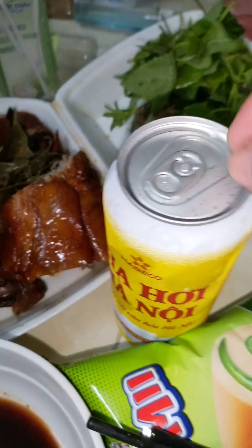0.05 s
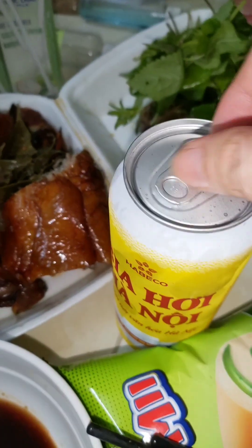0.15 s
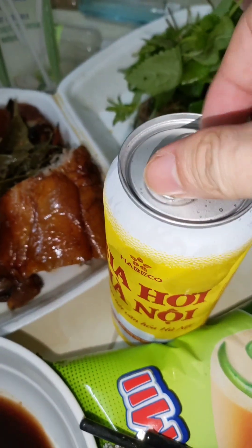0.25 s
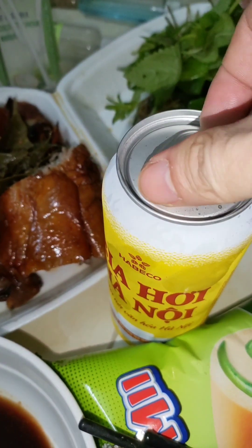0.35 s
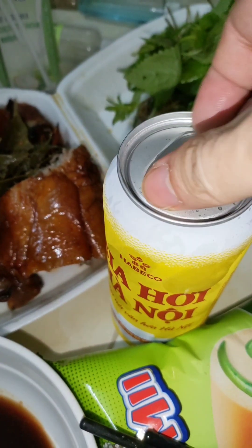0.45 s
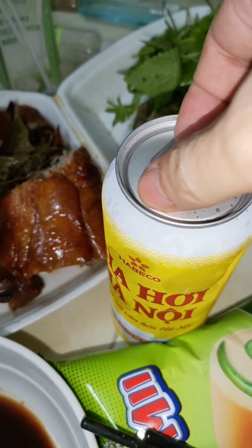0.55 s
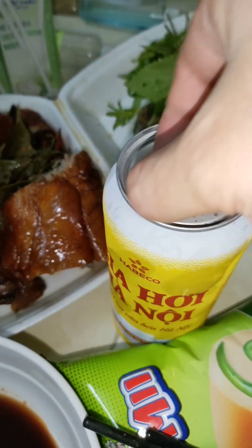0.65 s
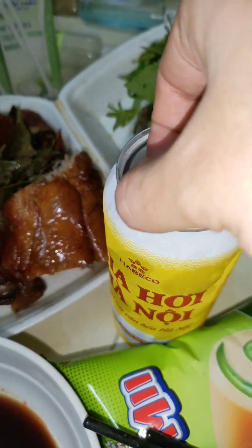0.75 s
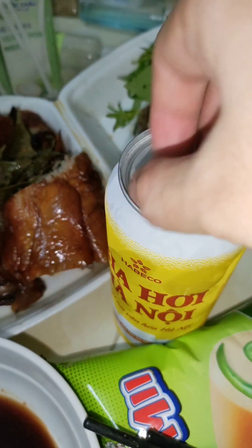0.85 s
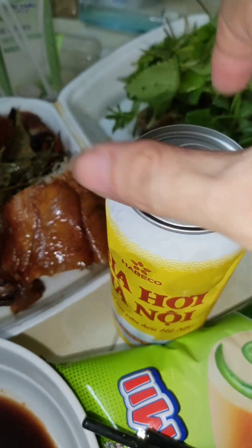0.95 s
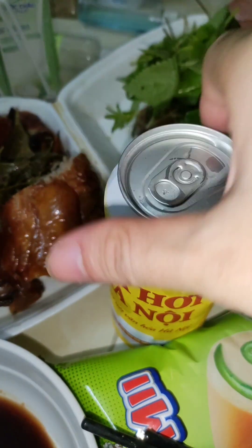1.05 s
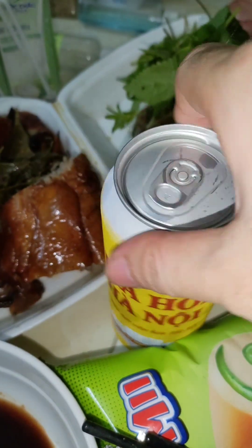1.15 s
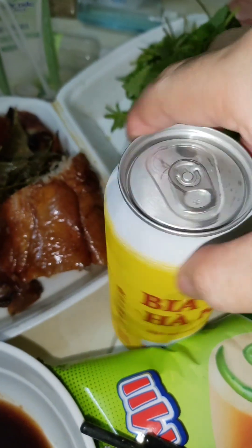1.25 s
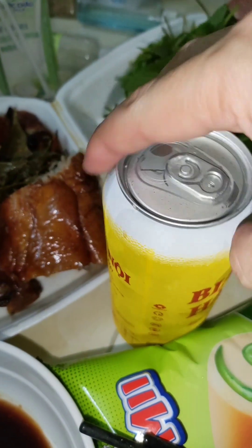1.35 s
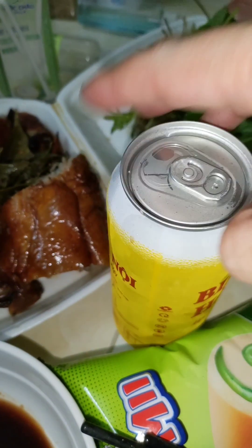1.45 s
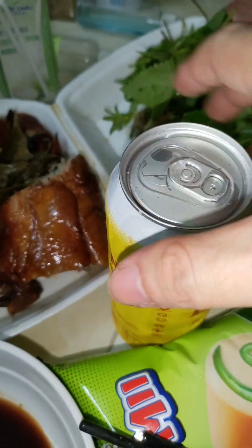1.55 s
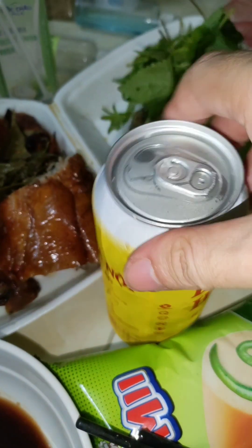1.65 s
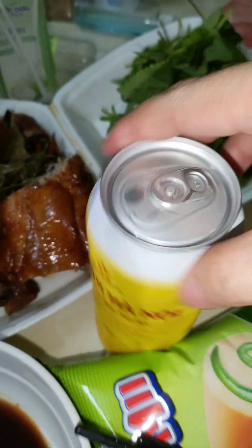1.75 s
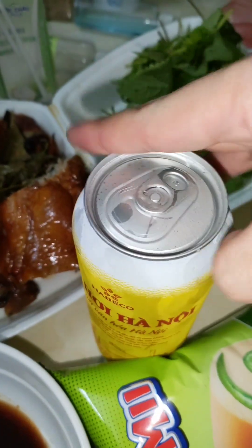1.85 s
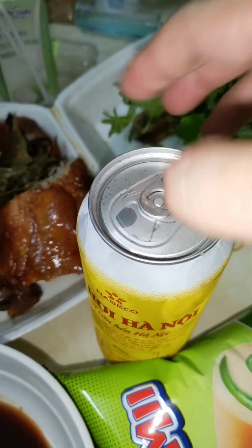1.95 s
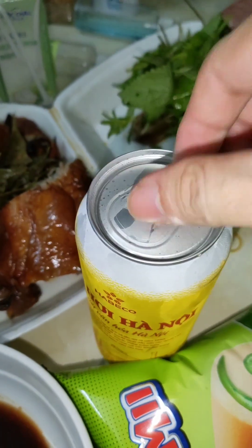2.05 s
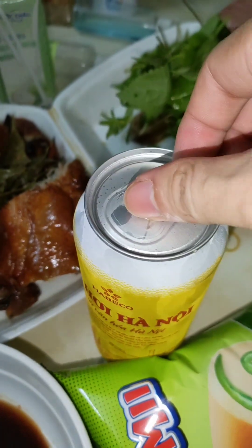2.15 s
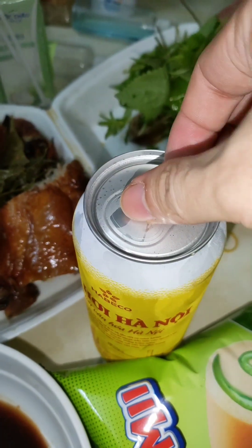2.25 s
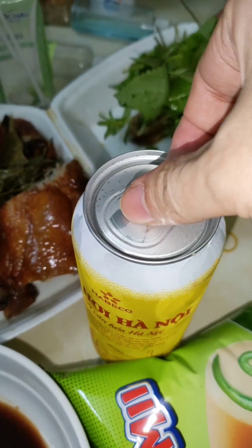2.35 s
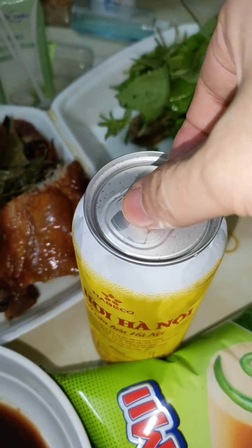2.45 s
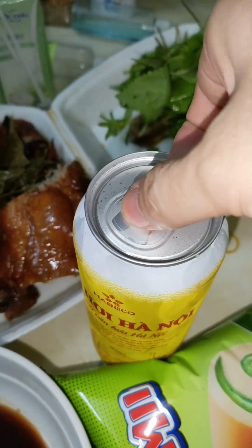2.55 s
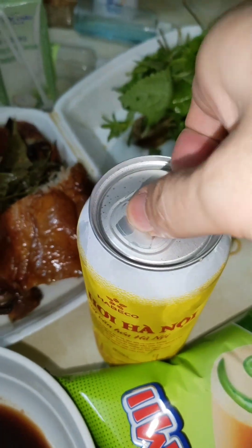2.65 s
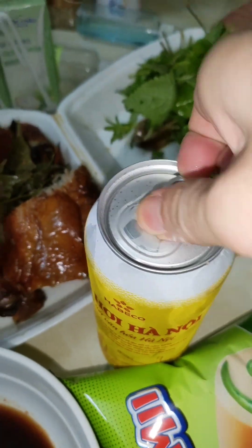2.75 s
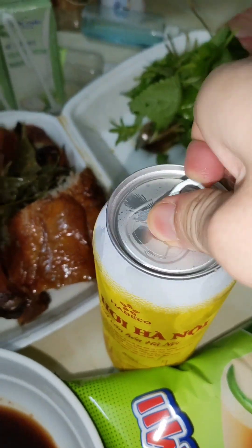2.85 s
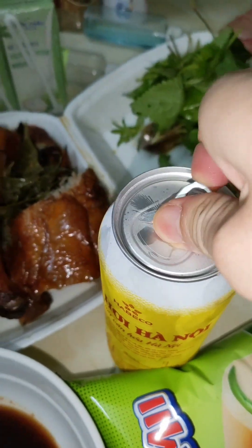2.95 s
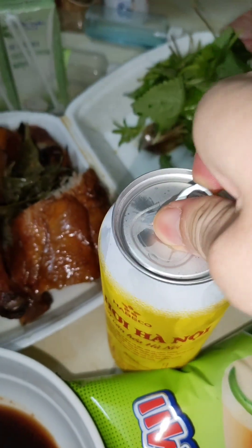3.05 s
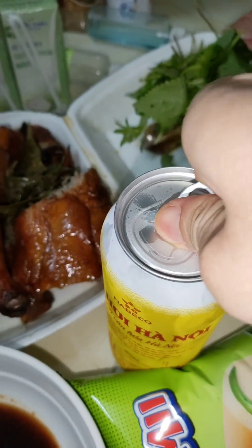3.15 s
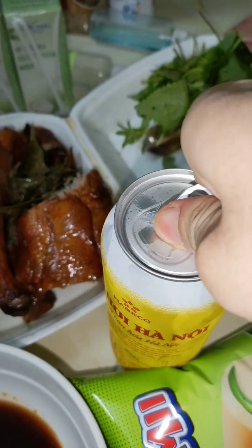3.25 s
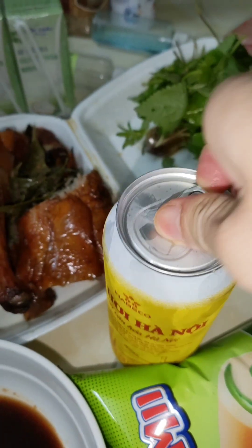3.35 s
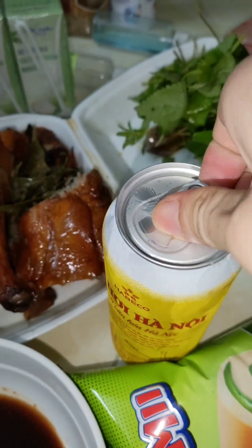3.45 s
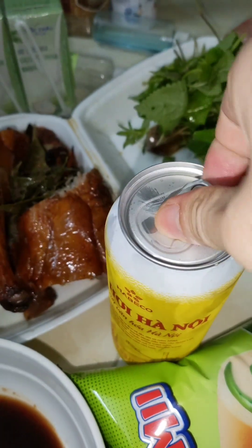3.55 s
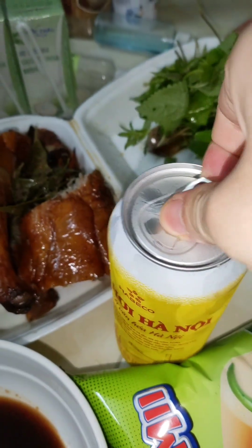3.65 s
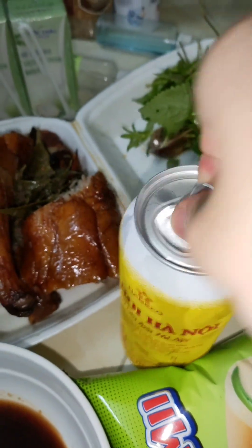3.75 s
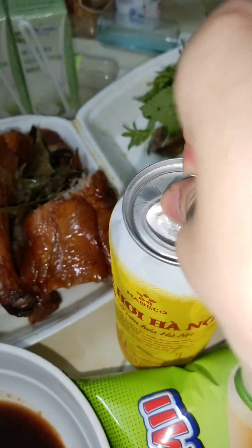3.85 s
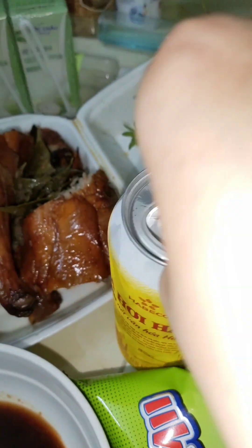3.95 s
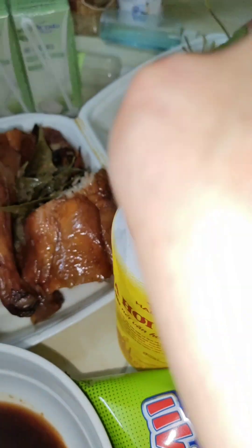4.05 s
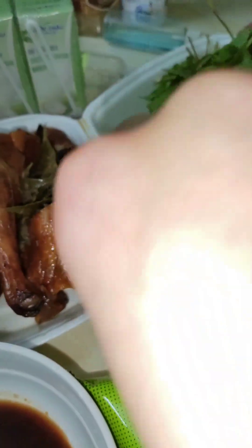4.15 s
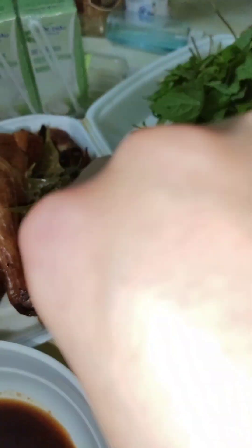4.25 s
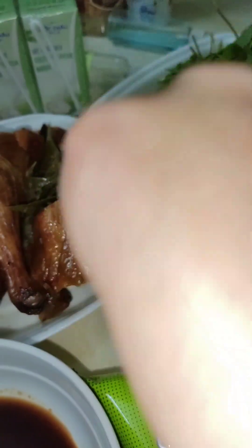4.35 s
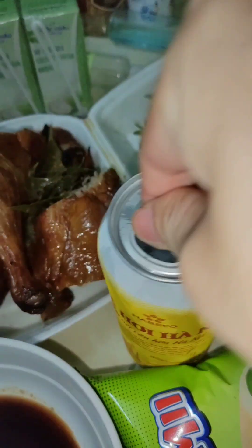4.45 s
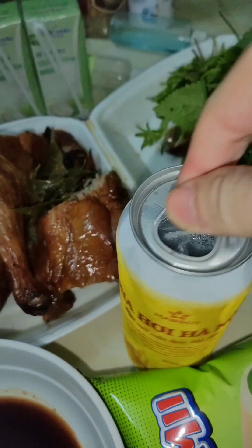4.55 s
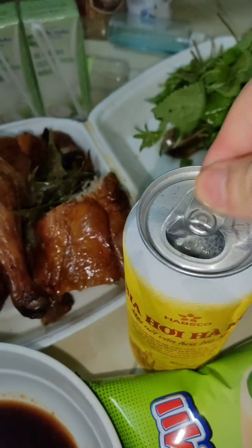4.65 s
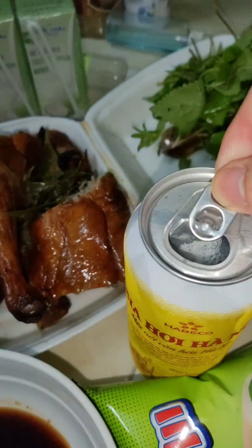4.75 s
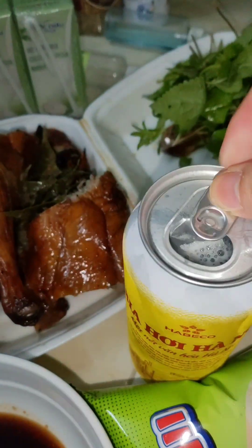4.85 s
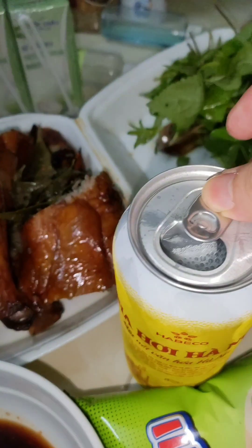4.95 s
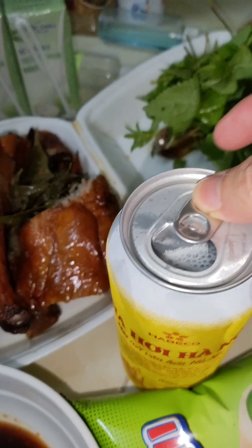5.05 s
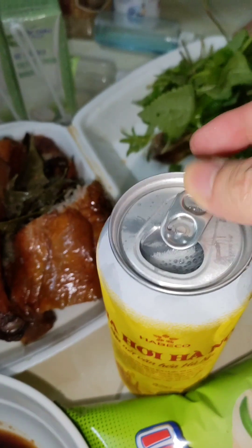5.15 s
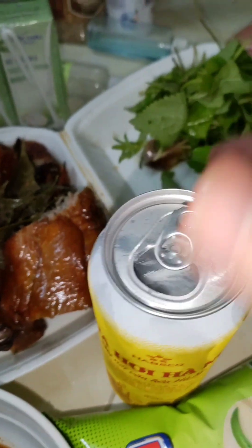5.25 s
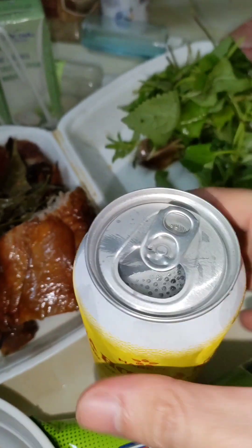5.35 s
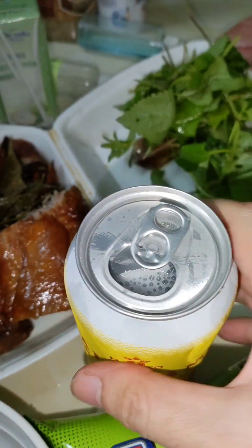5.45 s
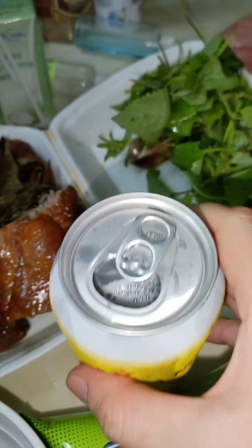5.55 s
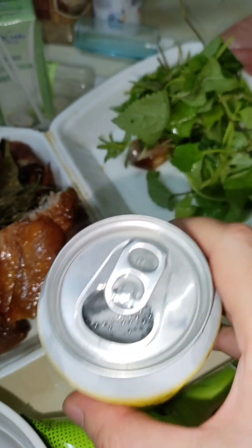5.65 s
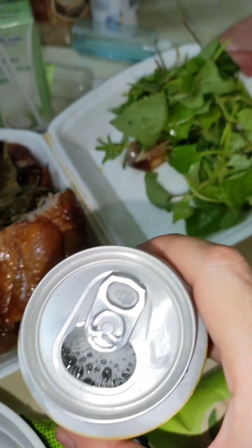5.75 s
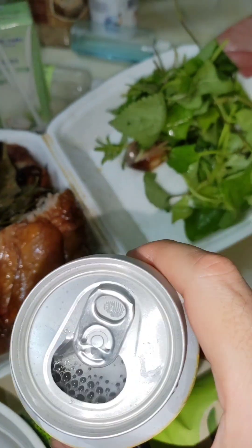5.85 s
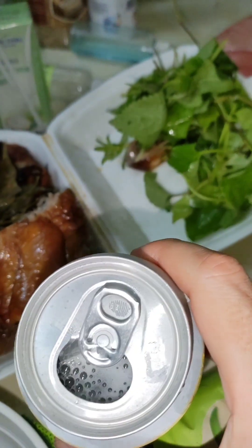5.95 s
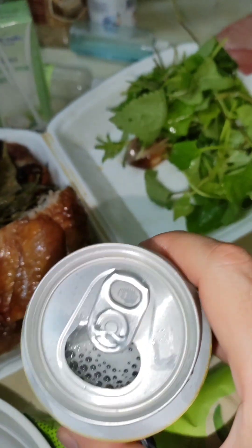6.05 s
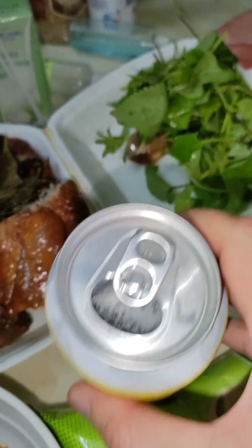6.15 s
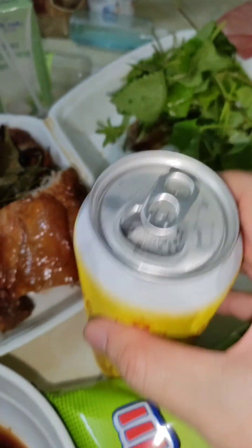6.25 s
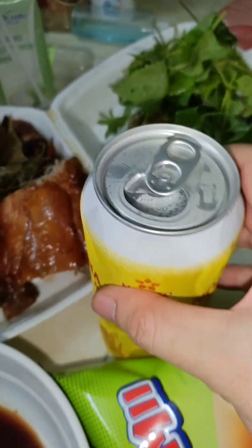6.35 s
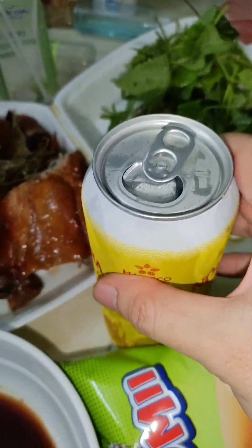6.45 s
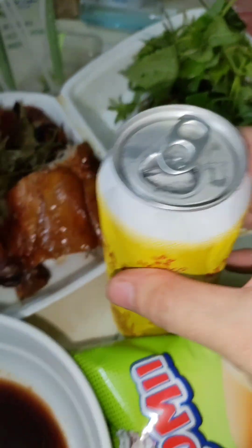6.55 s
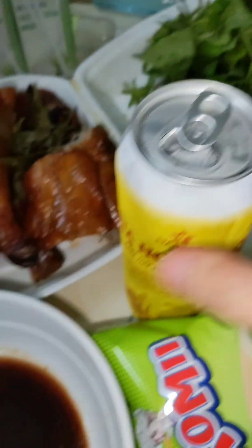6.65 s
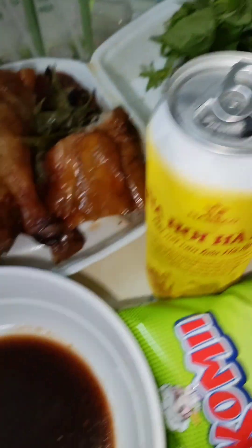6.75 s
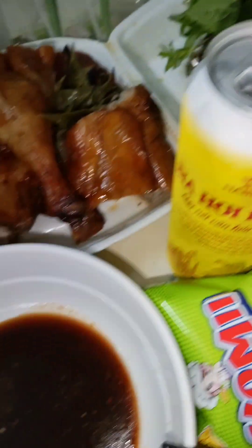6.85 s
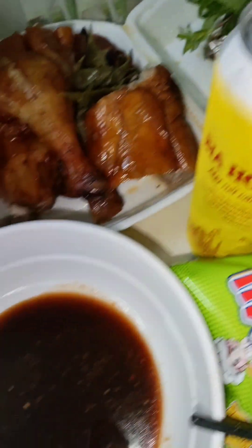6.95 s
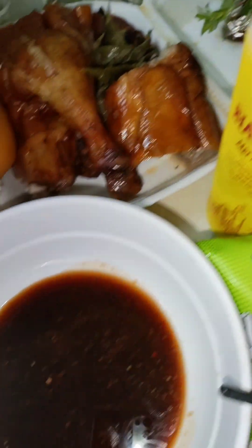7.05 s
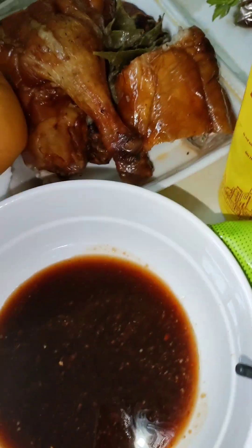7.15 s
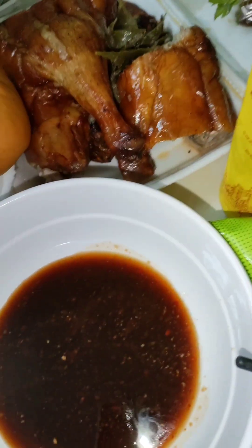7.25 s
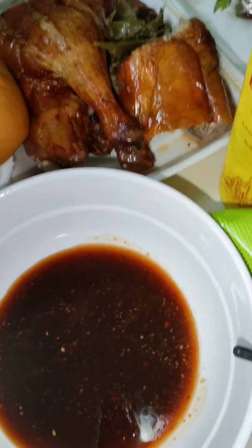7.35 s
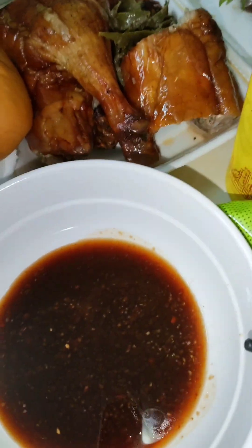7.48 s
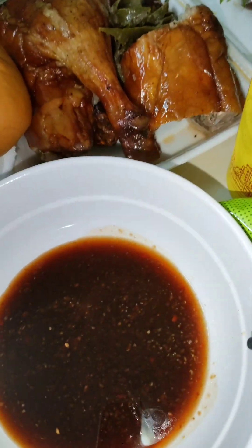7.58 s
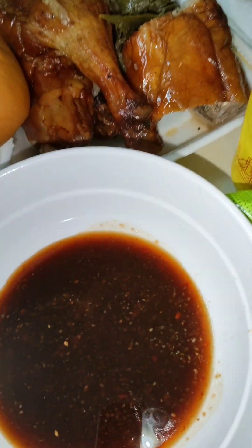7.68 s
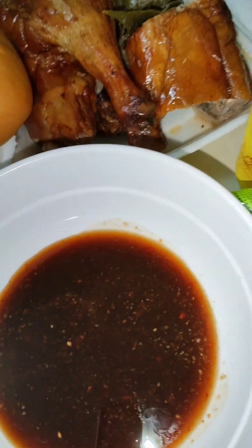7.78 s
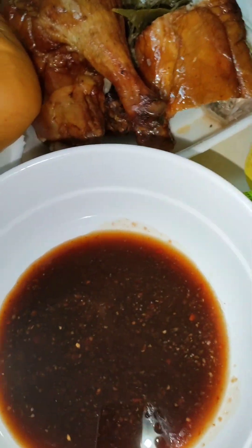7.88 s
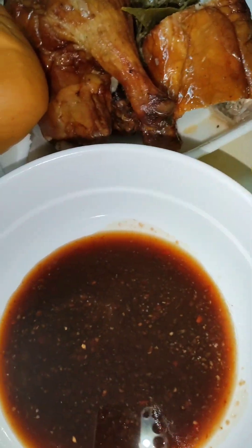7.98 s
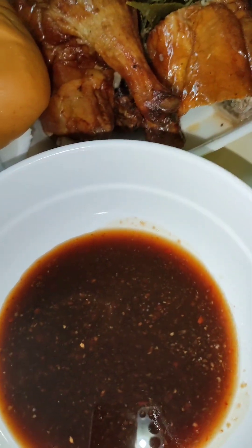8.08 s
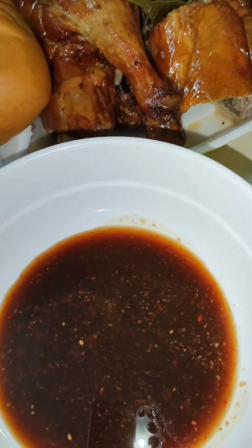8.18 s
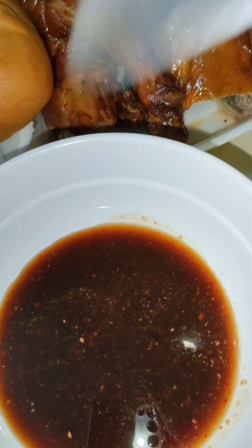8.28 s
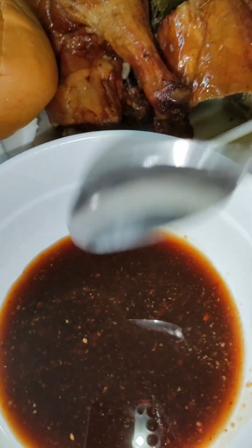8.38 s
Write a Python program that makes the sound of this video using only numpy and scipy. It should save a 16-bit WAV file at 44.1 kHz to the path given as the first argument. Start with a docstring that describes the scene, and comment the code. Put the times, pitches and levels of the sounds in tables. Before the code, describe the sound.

Very close stereo microphones in a small quiet room with low hum and faint rustle. Fingers tick and rub a full metal can, turning it on a table with squeaks; the tab snaps brightly, the seal cracks with a short gas spurt, the lid tears and pops. Afterwards the thin shell knocks twice, then sparse soft ticks, rattles and dull thuds.

```python
"""Small ticks over a low room hum and a wide rustle, then gritty rubs as a hand turns a full drink can on a table.
The pull tab is flicked, the seal cracks, gas hisses out, the lid tears and the thin shell pops back into shape.
Ticks, rattles, thuds and rustles follow as the can is moved. Two close microphones, the can nearer the left.
Struck metal and table top are sums of decaying modes; hiss, friction, ticks and rattles are shaped noise;
thuds are damped low swings, hoots gliding sines, pings and squeaks narrow noise bands that slide."""
import sys
import numpy as np
from scipy import signal
from scipy.fft import rfft, irfft, next_fast_len
from scipy.io import wavfile
from scipy.ndimage import uniform_filter1d

SR = 44100
rng = np.random.default_rng(int(sys.argv[2]) if len(sys.argv) > 2 else 0)


def generate_wav(sig):
    """Save sig (samples, or channels by samples) to the path in sys.argv[1] as 16-bit PCM at SR."""
    pcm = np.round(np.clip(np.atleast_2d(sig).T, -1, 1) * 32767).astype(np.int16)
    wavfile.write(sys.argv[1], SR, pcm)


N = 371322


def amp(db):
    """dB to gain."""
    return np.exp(np.asarray(db) * np.log(10) / 20)


def evened(x):
    """Scales to rms 1."""
    return x / np.sqrt(np.mean(x ** 2) + 1e-20)


def read(points, hz):
    """Reads a spectrum on a log-frequency axis."""
    f, value = np.transpose(points)
    return np.interp(np.log(hz + 1), np.log(f + 1), value)


def add(mix, s, sound):
    """Adds a sound into the mix at a time."""
    part = mix[..., round(s * SR):][..., :sound.shape[-1]]
    part += sound[..., :part.shape[-1]]


def panned(x, pan_db):
    """Sets left over right; the two gains average 1."""
    left = amp(pan_db)
    return x * np.array([[left], [1]]) * 2 / (1 + left)


def coloured(x, points):
    """Filters by a spectrum and splits at 6 kHz into body and treble, each of rms 1."""
    size = next_fast_len(N)
    hz = np.fft.rfftfreq(size, 1 / SR)
    z = rfft(x, size) * amp(read(points, hz))
    high = 1 / (1 + (6000 / (hz + 1)) ** 4)
    body = irfft(z * (1 - high), size)[..., :N]
    treble = irfft(z * high, size)[..., :N]
    return evened(body), evened(treble)


def gritty(shape, grit_db, span):
    """Noise whose loudness wanders from grain to grain, span samples each."""
    loudness = evened(uniform_filter1d(rng.standard_normal(shape[-1]), span))
    return rng.standard_normal(shape) * amp(grit_db * loudness)


def alike(a, b, same):
    """Mixes a into b so that b correlates with a by the given share."""
    return np.array([a, same * a + np.sqrt(1 - same ** 2) * b])


ALIKE = 0.13  # left-right likeness of near noise


def pair(noise):
    """Near noisy sources radiate from a spread of points, so the microphones hear them only partly alike."""
    return alike(noise[0], noise[1], ALIKE)


RISE_DB = -20.5  # start of each climb, re its top


def swells(rows):
    """Climb, hold and decay for each row; also the gain of a last column, where the rows have one."""
    t, level, extra = np.arange(N) / SR, np.full(N, 1e-9), np.zeros(N)
    for s, rise_s, hold_s, db, t60, *more_db in rows:
        at = slice(round(s * SR), round((s + rise_s + hold_s + 1.5 * t60) * SR))
        u = t[at] - s
        climb_db = RISE_DB * np.clip(1 - u / rise_s, 0, 1)
        fall_db = -60 * np.clip(u - rise_s - hold_s, 0, None) / t60
        shape = amp(db + climb_db + fall_db)
        level[at] += shape
        extra[at] += shape * amp(sum(more_db))
    return level, extra / level


# background levels: (time [s], low hum level [dB], wide rustle level [dB])
AROUND = [(0.2, -67.5, -68), (0.93, -66, -73.5), (1.05, -65, -73), (1.6, -64, -75), (2.1, -58.5, -61),
          (2.41, -60.5, -64.5), (2.52, -60.5, -73.5), (2.92, -86, -62), (3.079, -75, -80),
          (3.599, -63.5, -71), (4.0, -76, -75.5), (4.54, -73, -70.5), (4.72, -53, -69),
          (5.06, -66.5, -64.5), (5.318, -56, -56.5), (5.55, -71, -72), (5.86, -68, -64.5),
          (5.93, -82, -100.5), (6.131, -79.5, -78), (6.199, -76, -72), (6.651, -60.5, -70.5),
          (7.3, -69.5, -75), (7.58, -62, -65), (7.991, -63, -72), (8.051, -74, -80), (8.42, -67.5, -91.5)]
# hum spectrum, relative: (frequency [Hz], density [dB per Hz])
HUM = [(18, -54), (30, -33), (59, -22.5), (91, -21), (114, -9.5), (183, -7.5), (231, 0.5), (397, -21),
       (700, -21), (910, -43.5), (1540, -120)]
# rustle spectrum, relative: (frequency [Hz], density [dB per Hz])
RUSTLE = [(50, -48), (210, -25.5), (350, 0.5), (558, -13.5), (835, -2), (1930, -8.5), (6050, -13.5),
          (14000, -32), (15600, -34), (16400, -45)]
# sleeve and hand: (start [s], rise [s], hold [s], level [dB], t60 [s], treble over body [dB])
SWISHES = [(1.2, 0.04, 0.15, -58.5, 0.13, 3.5), (1.7, 0.19, 0.0099, -42, 0.42, -30),
           (2.2, 0.05, 0.0088, -63, 0.17, 13), (6.55, 0.17, 0.15, -59, 0.36, -4.5),
           (6.9, 0.1, 0.11, -61, 0.39, -15.5), (7.8, 0.056, 0.16, -69, 0.16, 0),
           (8.2, 0.13, 0.13, -64, 0.34, -1)]
HUM_SAME = .8  # left-right likeness
RUSTLE_TREBLE_DB = -14.5  # steady rustle, re its body
TABLE_DB, TABLE_S = -13.5, .03  # table drone under the rub: level re the rub, smoothing span


def around():
    """Lumpy low hum, nearly alike at both microphones, table drone driven by the rubs, unrelated wide rustle."""
    s, *columns = np.transpose(AROUND)
    hum_level, steady = (amp(np.interp(np.arange(N) / SR, s, c)) for c in columns)
    drone = amp(TABLE_DB) * uniform_filter1d(swells(RUBS)[0], round(TABLE_S * SR))
    a, b = coloured(gritty((2, N), 2.9, 900), HUM)[0]
    hum = alike(a, b, HUM_SAME) * (hum_level + drone)
    body, treble = coloured(gritty((2, N), 1.5, 200), RUSTLE)
    swish, bright = swells(SWISHES)
    treble_level = steady * amp(RUSTLE_TREBLE_DB) + swish * bright
    rustle = body * (steady + swish) + treble * treble_level
    return hum + rustle * amp([[-2], [2]])


# dry cracks and ticks: (time [s], peak level [dB], centre [Hz], left over right [dB])
TICKS = [(0.256, -41, 5230, -2), (0.566, -37, 4740, -1), (0.5795, -14, 3800, 1), (0.707, -34, 4000, 9),
         (0.729, -36.5, 4360, -1), (0.831, -44, 2500, 16), (0.855, -39, 5300, -5), (0.908, -37.5, 4000, 9),
         (0.918, -32.5, 5700, 1), (0.943, -36, 3100, -2), (1.1794, -26.5, 2070, -15),
         (1.4194, -31.5, 1600, 3), (1.694, -28.5, 2820, 30), (1.7444, -23.5, 3740, 0.5),
         (1.8035, -21, 3500, -2.5), (1.8855, -19.5, 2600, 9.5), (1.946, -17, 5610, -6.5),
         (1.991, -33.5, 3220, 0), (2.0755, -38, 4800, -5), (2.1247, -34.5, 5105, -6),
         (2.135, -28.5, 5140, 2), (2.1925, -9, 4140, 2.5), (2.1935, -11, 1390, -2), (2.268, -39, 4480, 4.5),
         (2.445, -43.5, 3070, 1), (2.345, -35, 5200, 7.5), (2.8527, -6.5, 4360, 5.5),
         (2.9211, -3.5, 4250, 7.5), (3.43, -32.5, 2370, -7.5), (3.4644, -32, 2450, -7.5),
         (3.6157, -45, 3000, -6), (3.644, -52, 2990, 1), (3.7505, -33.5, 4670, -2.5),
         (3.7664, -11.5, 4600, 9.5), (3.779, -7, 4500, 6.5), (3.791, -9, 4640, 9.5),
         (3.7982, -9.5, 1105, -0.5), (3.799, -12.5, 5000, 0), (4.118, -32, 6750, 4), (3.997, -49, 951, 1),
         (4.117, -41, 11750, -6), (4.2782, -49, 6630, 0.5), (4.4103, -40, 2810, 2),
         (4.626, -34.5, 2664, -11.5), (4.683, -41.5, 3500, -7), (4.694, -29.5, 4800, -1),
         (4.8024, -48, 4570, -2), (5.0065, -47, 3900, 3), (5.157, -38, 2025, 0), (5.24, -40, 4200, 0),
         (5.382, -50, 2650, -19.5), (5.7665, -26, 5540, -2), (5.713, -45, 2680, -9),
         (5.748, -40.5, 1400, -9), (5.812, -43, 1700, -6), (5.7668, -20, 2125, -12),
         (5.826, -32, 2020, -3.5), (6.2787, -35, 1430, -16), (6.335, -42, 1447, 7),
         (6.4286, -39.5, 1800, -13.5), (7.3166, -48, 2610, -12.5), (7.341, -49.5, 2480, -11.5),
         (7.381, -34, 1730, -14.5), (7.405, -47.5, 1220, -12.5), (7.4255, -32, 1740, 9),
         (7.47, -41, 2060, -5), (7.486, -47, 1810, -2), (7.556, -48.5, 663, 0), (7.672, -43, 656, -8),
         (7.721, -41, 1200, 2), (7.622, -41, 3500, -8), (7.739, -39, 3310, -6), (8.016, -49, 4480, -5.5),
         (5.6374, -51, 2850, -19)]
# random faint ticks: rate, base level re rustle, mean exponential excess, middle pitch
FAINT_PER_S, FAINT_DB, FAINT_SPREAD_DB, FAINT_HZ = 5, 6, 3, 3000
TICK_T60_S, TICK_SHORTER = 0.016, .012  # t60 at -41 dB; share lost per dB louder
SNAP = 1.2  # opening spike, re the noise peak


def faint_ticks():
    """Random rows for faint ticks that follow the rustle level."""
    s, _, rustle_db = np.transpose(AROUND)
    rows = []
    for when, size, pitch, side in rng.random((round(FAINT_PER_S * N / SR), 4)):
        at_s = when * N / SR
        db = FAINT_DB + np.interp(at_s, s, rustle_db) - FAINT_SPREAD_DB * np.log(size)
        rows.append((at_s, db, FAINT_HZ * 4 ** (pitch - .5), 16 * (side - .7)))
    return rows


def ticks():
    """Each tick is a sharp spike and a quick noise burst, both broad around one centre; louder ones die faster."""
    out, t = np.zeros((2, N)), np.arange(2048) / SR
    hz = np.fft.rfftfreq(2048, 1 / SR)
    rows = TICKS + faint_ticks()
    for (s, db, centre_hz, pan_db), noise in zip(rows, rng.standard_normal((len(rows), 2, 2048))):
        hump = 1 / np.sqrt(1 + (2.68 * np.log2((hz + 1) / centre_hz)) ** 4)
        rise = 1 - np.exp(-t / .0003)
        t60_s = TICK_T60_S * np.exp(-TICK_SHORTER * (db + 41))
        burst = irfft(rfft(pair(noise)) * hump) * amp(-60 * t / t60_s) * rise
        spike = np.roll(irfft(hump), 16) * np.sign(noise[0, 0])  # random polarity
        burst = burst / abs(burst).max() + SNAP * spike / abs(spike).max()
        add(out, s, panned(amp(db) * burst / abs(burst).max(), pan_db))
    return out


# the can slides, fingers rub it: (start [s], rise [s], hold [s], level [dB], t60 [s])
RUBS = [(.572, 0.0026, 0.0017, -47.5, 0.28), (.698, 0.0078, .002, -52.5, 0.2),
        (.824, 0.0048, 0.0028, -57, 0.47), (.895, 0.019, .002, -56.5, 0.26),
        (1.176, 0.0012, 0.21, -47.5, 0.34), (1.686, 0.0031, 0.0014, -51.5, 0.24),
        (1.69, 0.17, 0.038, -36.5, 0.081), (1.92, 0.0039, 0.0083, -40, 0.24),
        (2.1, 0.039, .002, -50, 0.052), (2.314, 0.0088, 0.0022, -46.5, 0.077),
        (3.425, 0.033, 0.0021, -44.5, 0.058), (4.106, 0.016, 0.0012, -50, 0.12),
        (4.33, 0.046, 0.0016, -56, 0.069), (4.404, 0.0041, 0.0017, -52.5, 0.12)]
# rub spectrum, relative: (frequency [Hz], density [dB per Hz])
RUB_COLOUR = [(50, -53.5), (180, -27.5), (300, -28), (648, -9), (1160, -4), (1380, -19), (2130, 3.5),
              (3760, -2.5), (4300, -12.5), (5810, 1.5), (8260, -14.5), (14300, -28.5), (15600, -33.5),
              (16400, -48)]
RUB_TREBLE_DB, RUB_RING_DB = -13.5, -14.5  # re the body; shell ring re the rub


def rubbing():
    """Gritty friction under each stroke; some of it rings the upper shell modes, flattened and damped."""
    level = swells(RUBS)[0]
    body, treble = coloured(pair(gritty((2, N), 3., 70)), RUB_COLOUR)
    rub = level * (body + amp(RUB_TREBLE_DB) * treble)
    t = np.arange(2000) / SR
    shell = sum(amp(0.089 * db - 60 * t / min(t60, .11)) * np.sin(2 * np.pi * hz * t)
                for hz, db, t60 in SHELL[5:])
    ring = signal.oaconvolve(rub, shell[None] / np.linalg.norm(shell))[:, :N]
    return rub + amp(RUB_RING_DB) * ring


# short metallic pings of early touches, sliding metal, hollow note of the opened can:
# (start [s], length [s], from [Hz], to [Hz], level [dB])
SQUEAKS = [(0.58, .06, 4830, 4780, -57), (0.913, .05, 5320, 5260, -56.5), (0.827, .025, 2510, 2590, -60),
           (1.223, .014, 5720, 6100, -52), (1.309, .018, 2255, 3200, -40.5),
           (1.333, 0.02, 5750, 5600, -47.5), (1.358, 0.012, 3720, 3900, -48),
           (1.684, 0.021, 2866, 2800, -37), (1.725, 0.027, 1930, 2350, -59),
           (1.86, 0.035, 1890, 2600, -44.5), (1.881, .018, 2820, 3000, -37), (3.808, 0.047, 764, 880, -60),
           (3.844, 0.19, 1080, 1008, -58.5), (7.421, .02, 1830, 1693, -45.5), (7.884, 0.1, 1199, 2050, -59)]
# random squeaks: draws per second (only those under audible rubs sound), level re the rub, middle pitch, mean length
STRAY_PER_S, STRAY_DB, STRAY_HZ, STRAY_S = 70, -6, 3300, .014
SQUEAK_FUZZ, SLIDE_FUZZ = 3.5, .2  # wavers per squeak; extra wavers per second per Hz of slide


def stray_squeaks():
    """Random squeak rows that follow the rub level; those at -80 dB or less are dropped."""
    rub, rows = swells(RUBS)[0], []
    for when, long, pitch, slide in rng.random((round(STRAY_PER_S * N / SR), 4)):
        from_hz = STRAY_HZ * 3.5 ** (pitch - .5)
        db = STRAY_DB + 20 * np.log10(rub[int(when * (N - 1))])
        if db > -80:
            at_s, length_s = when * (N - 1) / SR, STRAY_S * (.5 + long)
            rows.append((at_s, length_s, from_hz, from_hz * (.9 + .4 * slide), db))
    return rows


def pings_and_squeaks():
    """Narrow bands of noise whose centre slides and levels off."""
    out = np.zeros(N)
    for s, length_s, from_hz, to_hz, db in SQUEAKS + stray_squeaks():
        u = np.arange(round(length_s * SR)) / (length_s * SR)
        turns = np.cumsum(from_hz + (to_hz - from_hz) * np.sin(np.pi / 2 * u)) / SR
        wavers = SQUEAK_FUZZ + SLIDE_FUZZ * length_s * abs(to_hz - from_hz)
        fuzz = uniform_filter1d(rng.standard_normal((2, len(u))), round(len(u) / wavers), mode="wrap")
        fuzz[0] += fuzz.std()  # steady part
        band = fuzz[0] * np.cos(2 * np.pi * turns) + fuzz[1] * np.sin(2 * np.pi * turns)
        add(out, s, amp(db) * evened(band) * np.sin(np.pi * u) ** .5)
    return out


BUZZ_S, BUZZ_HZ = .003, 7000  # flutter grain; pitch from which it is full


def struck(blows, modes, spread_db, rise_s, linger_db, drop=()):
    """Each blow rings the modes at randomly uneven strength; loose metal flutters, a faint ring lingers."""
    out, t = np.zeros(N), np.arange(SR // 3) / SR
    mode_hz, mode_db, t60 = np.transpose(modes)[:, :, None]
    drop = np.pad(drop, (0, len(modes) - len(drop)))[:, None]
    draws = rng.random((len(blows), 3, len(modes), 1))
    for (s, db, length, tilt_db, *pressed), (turn, luck, bend) in zip(blows, draws):
        hz = mode_hz * (1 - drop * sum(pressed))
        fall_db = -60 * t / (t60 * max(length, .1))
        fade = amp(fall_db) + amp(linger_db + .3 * fall_db)
        a, b = rng.standard_normal((2, len(modes), round(t[-1] / BUZZ_S) + 2))
        grains = np.array([np.interp(t / BUZZ_S, np.arange(len(row)), row) for row in a + 1j * b])
        depth = np.minimum(hz / BUZZ_HZ, 1) * (1 - np.exp(-t / BUZZ_S))
        flutter = 1 + depth * grains / 2
        cycles = hz * (1 + 0.008 * (bend - .5)) * t + 0.52 * turn
        swing = (flutter * np.exp(2j * np.pi * cycles)).imag
        height = amp(mode_db + tilt_db * np.log2(hz / hz[0]) + spread_db * (luck - .5))
        ring = (height * fade * swing).sum(0) * (1 - np.exp(-t / rise_s))
        add(out, s, amp(db) * ring / abs(ring).max())
    return out


# shell knocks and pops: (time [s], peak level [dB], ring length re the mode t60 [ratio], brightness [dB per octave])
DENTS = [(0.832, -57.5, 0.61, -3), (1.179, -26.5, 0.79, 3.5), (1.693, -30, 0.79, 5),
         (1.873, -30.5, 0.43, -1.5), (1.925, -27, 0.22, 0), (2.322, -39.5, 0.32, -7),
         (2.781, -43, 0.38, 6.5), (3.426, -35.5, 0.95, 6), (3.81, -27, 1.6, 13.5), (4.411, -51, 0.58, -8),
         (4.627, -29.5, 0.35, -2.5), (4.683, -20.5, 0.49, -2), (4.688, -17, 1.1, 0.5),
         (4.694, -44, 1.23, 13), (4.892, -44, 0.34, -9.5), (5.157, -50, 0.91, 5), (5.224, -36, 1.04, -0.5),
         (5.233, -15.5, 0.53, -4), (5.241, -26.5, 1.07, 3), (5.55, -47, 0.38, 3), (6.431, -29, 0.24, -7)]
# shell modes: (frequency [Hz], level [dB], t60 [s])
SHELL = [(982, -16, .3), (1042, -14, .3), (1070, 0, .04), (1115, -17, .25), (1157, -14, .3),
         (1195, -11, .19), (1775, -15, .08), (2280, -19, .06), (2800, -10, .07), (3310, -18, .05),
         (3850, -13, .07), (4750, -22, .08), (5240, -19, .055)]
# shell before the lid tears open, one value per SHELL mode from the lowest: (added level [dB])
UNTORN_DB = [-14, -12, -5, 8, 2, -12, -10, 5, 3]
TEAR_S = 3.76  # the lid tears open


def shell_knocks():
    """Until the lid tears open the shell is taut, favouring mid-cluster modes and some above 2 kHz."""
    taut = [(hz, db + more_db, t60) for (hz, db, t60), more_db in zip(SHELL, UNTORN_DB)]
    taut += SHELL[len(UNTORN_DB):]
    before = [row for row in DENTS if row[0] < TEAR_S]
    after = [row for row in DENTS if row[0] >= TEAR_S]
    return sum(struck(blows, modes, spread_db=5., rise_s=.003, linger_db=-30)
               for blows, modes in ((before, taut), (after, SHELL)))


# dull pushes of air and table: (time [s], peak level [dB], pitch [Hz], left over right [dB])
THUDS = [(1.185, -32, 278, 2), (1.419, -38, 335, -10), (1.878, -26, 258, 1), (2.1927, -9.5, 126, 9),
         (2.409, -37.5, 290, -10), (2.853, -25.5, 183, 13), (2.8995, -19.5, 156, 22),
         (2.9216, -17.5, 143, 22), (3.769, -27, 177, -18), (3.7975, -12, 253, 29), (4.628, -48, 228, 6),
         (4.69, -33, 225, 1), (5.234, -40, 284, 3), (5.769, -31.5, 547, -10), (6.279, -36.5, 546, 8),
         (6.432, -39, 272, 7), (7.383, -36.5, 305, -5), (7.408, -39, 246, -9), (7.429, -42, 233, -11),
         (7.748, -31.5, 189, -8), (7.7523, -31, 167, -8)]


def thuds():
    """A sudden pull, a slower rebound and a short low ring; nothing far below its pitch radiates."""
    out, t = np.zeros((2, N)), np.arange(4000) / SR
    for s, db, hz, pan_db in THUDS:
        u = 2 * np.pi * hz * t
        swing = u ** .55  # slows down
        push = -np.sin(2.79 * swing) * np.exp(-.3 * u) / (1 + 0.49 * u)
        push = signal.lfilter(*signal.butter(2, [0.37 * hz, 7000], "band", fs=SR), push)
        add(out, s, panned(amp(db) * push / abs(push).max(), pan_db))
    return out


# tab slaps the lid and bounces:
# (time [s], peak level [dB], ring length re the mode t60 [ratio], brightness [dB per octave], thumb pressure [0-1])
FLICKS = [(1.925, -20, 0.95, -5.5, 0.15), (1.948, -28.5, 1.3, -4.5, 0), (1.99, -30.5, 1.05, -6, 0.02),
          (2.005, -40.5, 1.6, -3, 0.06), (2.075, -45.5, 0.45, -8, 0), (2.1925, -6, 0.77, 6.5, 0.77),
          (2.211, -25, 1.7, 8, 0.7), (2.239, -28, 1.1, 1, 0.78), (2.2465, -20.5, 0.73, 1, 0.93),
          (2.322, -47, 1.2, -2, 0.8)]
# tab modes: (frequency [Hz], level [dB], t60 [s])
TAB = [(2190, -10, .3), (3320, -7, .13), (4125, -9, .12), (4850, -10, .03), (5390, -11, .12),
       (5840, -19, .16), (6960, 1, .09), (7900, -14, .06), (8520, 1, .062), (9570, -16, .08),
       (10170, -3, .06), (11250, -15, .06), (11780, -8, .06), (13280, -8, .06), (14300, -20, .05),
       (15170, -15, .06)]
# lowest tab modes under full thumb pressure: (pitch drop [share])
PRESSED_DROP = [.078, .108, .015]


def tab_flicks():
    """The small tab rings high; the thumb lowers its lowest modes."""
    return struck(FLICKS, TAB, spread_db=7., rise_s=.0004, linger_db=-25, drop=PRESSED_DROP)


# bumps on the table: (time [s], peak level [dB], ring length re the mode t60 [ratio], brightness [dB per octave])
BUMPS = [(1.945, -38, 0.62, 3), (1.992, -35.5, 0.25, -7), (2.409, -48, 0.085, -4), (3.81, -41, 0.68, 2.5),
         (7.383, -39.5, 0.1, -7), (7.429, -47, 0.32, 3), (7.658, -49, 0.13, -7), (7.742, -38.5, 0.19, 2)]
# table modes: (frequency [Hz], level [dB], t60 [s])
TABLE_TOP = [(794, -6, 0.24), (856, 0, 0.31)]


def table_bumps():
    """Bumps ring two close modes of the table top."""
    return struck(BUMPS, TABLE_TOP, spread_db=6., rise_s=.002, linger_db=-30)


def strokes(rows):
    """Lays level and treble curves on the time line, silent outside them."""
    t, out = np.arange(N) / SR, np.zeros((2, N))
    s, db, treble_db = np.transpose(rows)
    on = (t >= s[0]) & (t < s[-1])
    out[0, on] = amp(np.interp(t[on], s, db)) * signal.windows.tukey(on.sum(), .04)
    out[1, on] = amp(np.interp(t[on], s, treble_db))
    return out


# squirt through the first slit, its dying hiss, sigh of the torn lid; each: (time [s], level [dB], treble re body [dB])
JETS = [
    [(2.853, -37, -20), (2.862, -37.5, 2), (2.89, -27.5, -3), (2.9, -26.5, -1.5), (2.918, -22, -9.5),
     (2.93, -46.5, -13)],
    [(2.92, -36.5, -5), (2.94, -48.5, 3), (3.0, -61, 6.5), (3.08, -66.5, -5), (3.16, -82, -10.5),
     (3.3, -84, -8)],
    [(3.762, -32, -6.5), (3.785, -30.5, 3), (3.803, -29.5, -6.5), (3.812, -42, 1), (3.87, -46, -7),
     (3.95, -57, -9), (4.07, -76, -22)],
]
# their spectra, relative; each: (frequency [Hz], density [dB per Hz])
JET = [
    [(180, -31), (300, -13.5), (1800, -8.5), (5250, 2), (6210, -6.5), (6750, -5), (15100, -7),
     (16400, -32.5)],
    [(180, -60), (300, -35.5), (399, -32), (766, -39), (985, -37.5), (3340, -19.5), (5340, -0.5),
     (14300, -30.5), (16400, -38)],
    [(180, -27.5), (300, -4), (399, -32), (1040, -3), (1290, -10), (3020, 2), (5910, -13), (13900, -37.5),
     (16400, -47)],
]


def gas():
    """Smooth turbulent hiss, each burst in its own colour."""
    out = np.zeros((2, N))
    for rows, colour in zip(JETS, JET):
        level, treble_gain = strokes(rows)
        body, treble = coloured(pair(gritty((2, N), 1.6, 60)), colour)
        out += level * (body + treble_gain * treble)
    return out


# the lifted tab strains the lid: (start [s], rise [s], hold [s], level [dB], t60 [s])
STRAINS = [(3.1, 0.059, 0.11, -68.5, .1), (3.23, 0.051, 0.018, -67, .15), (3.34, 0.042, 0.043, -66.5, 0.17),
           (3.455, 0.0076, 0.013, -49.5, 0.21), (3.5, 0.017, 0.051, -67.5, .25),
           (3.612, 0.0061, 0.025, -65, 0.13)]
# lid modes: (frequency [Hz], level [dB], t60 [s])
LID = [(2540, -4, .12), (2953, 0, .17), (3380, -9, .07), (3810, -7, .09)]


def strained_lid():
    """Tiny slips under the lifted tab keep the lid modes faintly and unevenly singing."""
    t = np.arange(SR // 5) / SR
    ring = sum(amp(db - 60 * t / t60) * np.sin(2 * np.pi * hz * t) for hz, db, t60 in LID)
    slips = swells(STRAINS)[0] * evened(gritty((N,), 3., 300))
    return signal.oaconvolve(slips, ring / np.linalg.norm(ring))[:N]


# air in the opened can after a jolt: (time [s], level before rise and decay [dB], settled pitch [Hz])
HOOTS = [(3.814, -55, 304), (4.628, -42.5, 227.3), (5.256, -43, 295.3)]
HOOT_RISE_S, HOOT_T60_S, HOOT_SLIDE = 0.0085, 0.4, 0.17  # slide: share below pitch at the start


def hoots():
    """The can's air resonates: a low tone that swells, slides up and dies."""
    out, t = np.zeros(N), np.arange(SR // 3) / SR
    grown = 1 - np.exp(-t / HOOT_RISE_S)
    for s, db, hz in HOOTS:
        turns = np.cumsum(hz * (1 - HOOT_SLIDE * (1 - grown))) / SR
        add(out, s, amp(db - 60 * t / HOOT_T60_S) * grown * np.sin(2 * np.pi * turns))
    return out


# crumbly rattles after knocks and under the moving hand:
# (start [s], rise [s], hold [s], level [dB], t60 [s], left over right [dB])
RATTLES = [(4.62, 0.0061, 0.045, -44, 0.11, -0.5), (4.685, 0.0045, 0.0028, -31.5, 0.094, 0.5),
           (4.7, 0.025, 0.0016, -51.5, 0.42, -5), (5.232, 0.0066, 0.0025, -36, 0.14, 3.5),
           (5.26, 0.0066, 0.0014, -49.5, 0.33, -16), (5.762, 0.0047, 0.0016, -42, 0.098, 2),
           (5.795, 0.028, 0.0018, -48.5, 0.063, -3.5), (6.325, 0.0044, 0.0018, -53.5, 0.35, -3),
           (6.42, 0.0091, 0.0022, -50.5, 0.12, -5), (7.374, 0.0036, 0.055, -58, .1, -3.5),
           (7.416, 0.0053, 0.0023, -53, 0.26, -5), (7.636, 0.0043, 0.085, -61.5, 0.12, -7),
           (7.44, 0.03, 0.019, -61.5, 0.048, -5), (7.734, 0.0051, 0.0015, -41.5, 0.13, -3)]
# rattle spectrum, relative: (frequency [Hz], density [dB per Hz])
RATTLE = [(50, -49.5), (200, -7.5), (500, -6.5), (900, -2), (1800, -7), (2800, -4.5), (4000, -14.5),
          (6500, -14.5), (16000, -21.5)]


def rattles():
    """Lumpy dull noise, partly different at each microphone."""
    level, left = swells(RATTLES)
    a, b = coloured(pair(gritty((2, N), 4.2, 80)), RATTLE)[0]
    return level * np.array([left * a, b]) * 2 / (1 + left)


# near sources at full lean: (frequency [Hz], left over right [dB])
LEAN = [(100, 9), (500, 20.5), (1500, -3.5), (8000, -8)]
LAG_S = .0002  # right after left


def ports(x, lean, lag_s=LAG_S):
    """The right microphone gets a near sound later and, by the lean share, with less bass."""
    size = next_fast_len(N)
    hz = np.fft.rfftfreq(size, 1 / SR)
    half = amp(lean * read(LEAN, hz) / 2)
    right = np.exp(-2j * np.pi * hz * lag_s) / half
    return irfft(rfft(x, size) * np.array([half, right]), size)[:, :N]


# room decay: (frequency [Hz], t60 [s])
ROOM = [(100, 0.36), (1000, 0.057), (5000, 0.45), (15000, 0.096)]


def room(x):
    """Sparse taps of random sign, each band dying at its own speed."""
    taps = np.zeros((2, SR // 2))
    grid = np.arange(160, SR // 2 - 20, 20)
    at = grid + rng.integers(0, 20, (2, len(grid)))
    np.put_along_axis(taps, at, rng.choice([-1., 1.], at.shape), 1)
    hz, t, z = signal.stft(taps, SR, nperseg=256)
    tail = signal.istft(z * amp(-60 * t / read(ROOM, hz)[:, None]), SR, nperseg=256)[1]
    return signal.fftconvolve(x[None], tail / np.linalg.norm(tail[0]), axes=1)[:, :N]


def scene():
    """Near can, ticks and table, their room tail, and the background."""
    wide = ports(shell_knocks() + hoots(), 0.33, lag_s=.00009)  # wide shell: smaller lag
    close = ports(tab_flicks() + strained_lid() + pings_and_squeaks() + rubbing() + gas(), 0.71)
    unleaned = ports(ticks() + rattles() + thuds() + table_bumps(), 0)
    near = wide + close + unleaned
    return near + amp(-20.0) * room(near.mean(0)) + around()


START_S, FADE_S = 0.202, 0.011
CEILING, EDGE_HZ = .8, 16400  # soft full-scale limit; low-pass edge


def record(dry):
    """Quick fade-in, soft saturation of peaks, then the band limit."""
    fade = np.clip((np.arange(N) / SR - START_S) / FADE_S, 0, 1)
    squashed = dry * fade / (1 + (dry / CEILING) ** 4) ** .25
    low_pass = signal.firwin(511, EDGE_HZ, window=("kaiser", 9), fs=SR)
    return signal.oaconvolve(squashed, low_pass[None], "same")


dry = scene()
out = record(dry)
generate_wav(out)
```